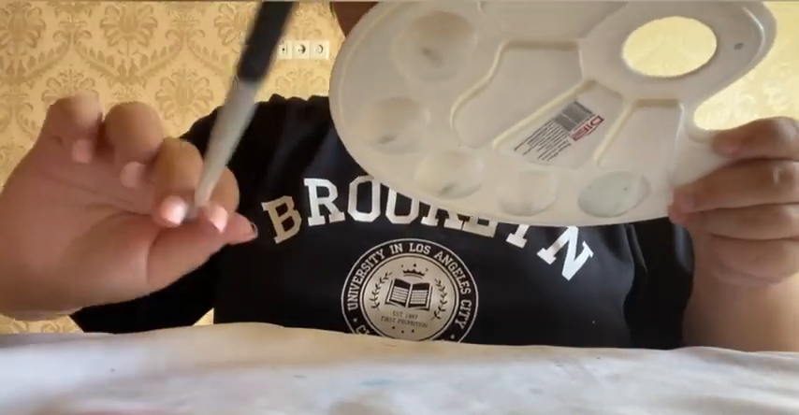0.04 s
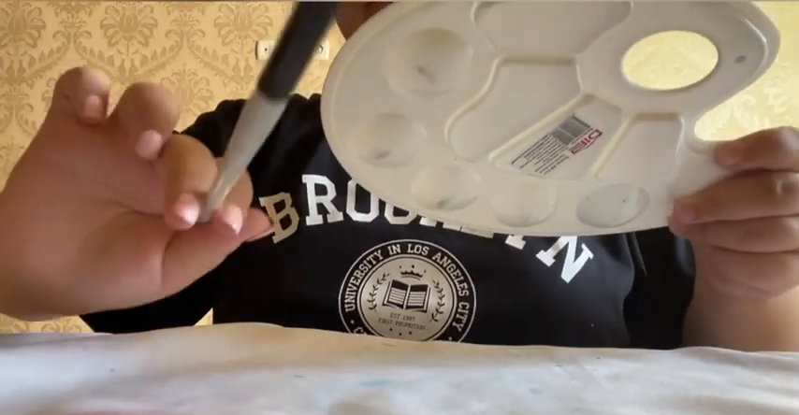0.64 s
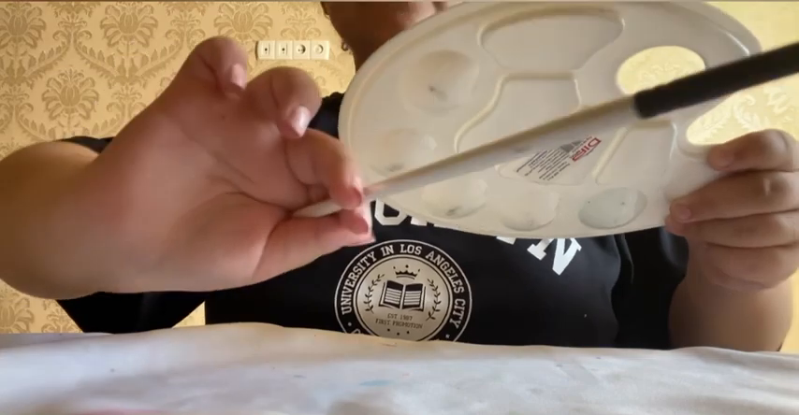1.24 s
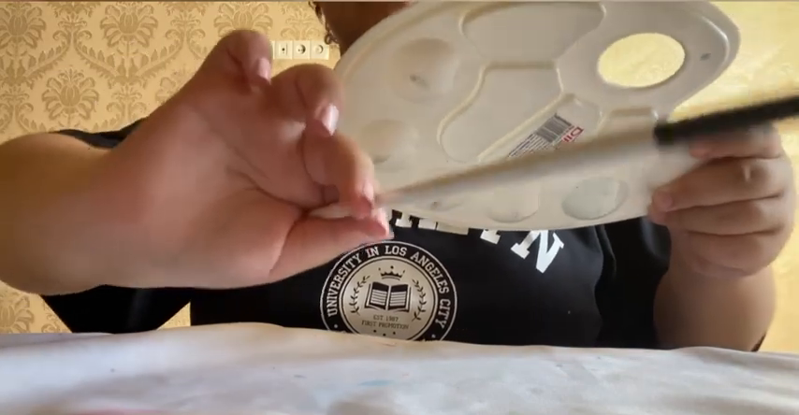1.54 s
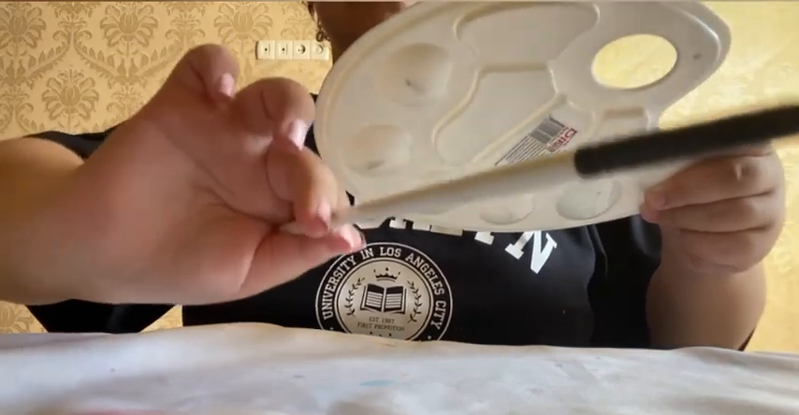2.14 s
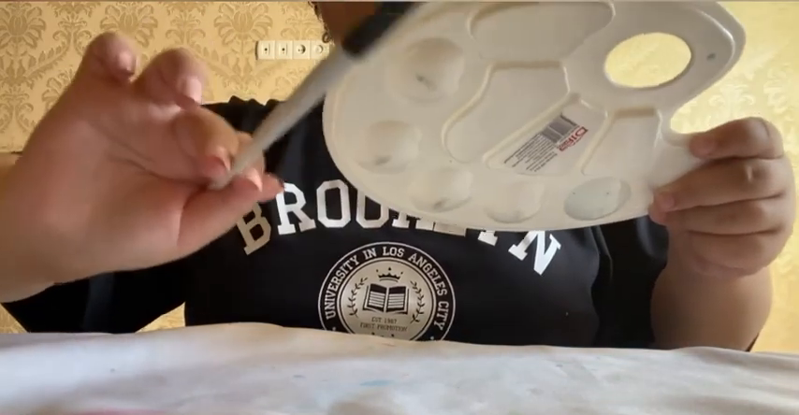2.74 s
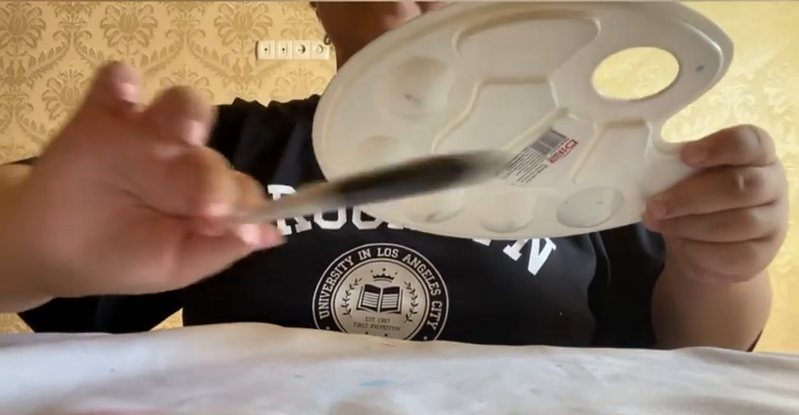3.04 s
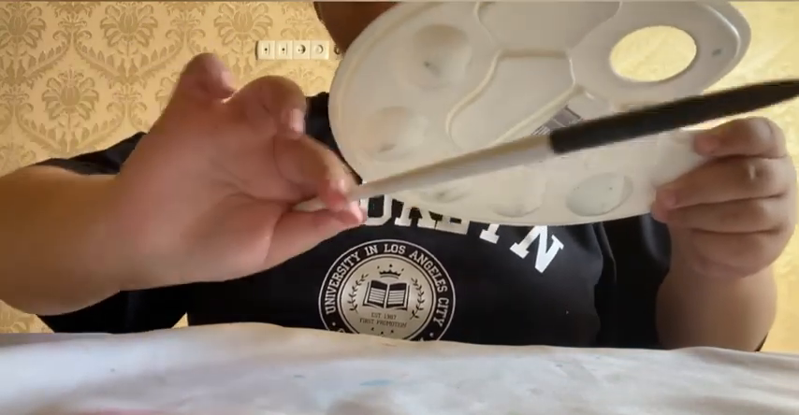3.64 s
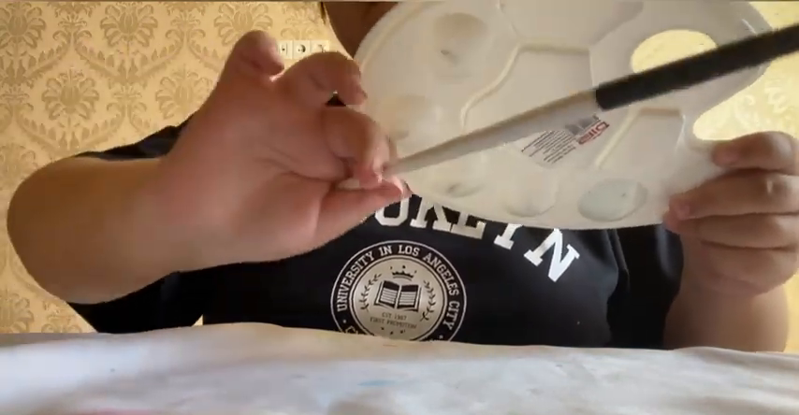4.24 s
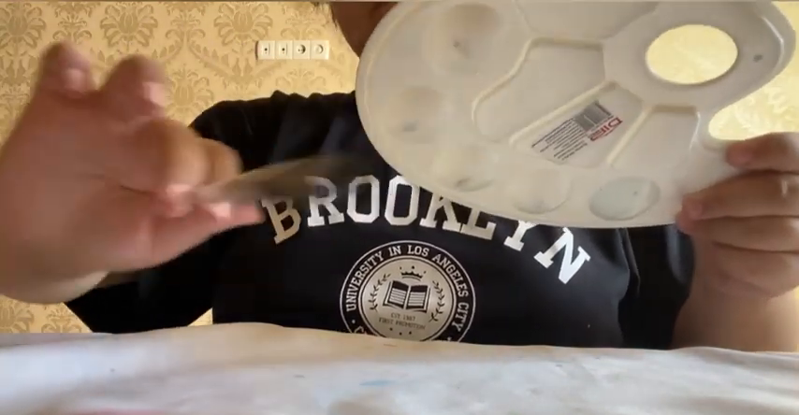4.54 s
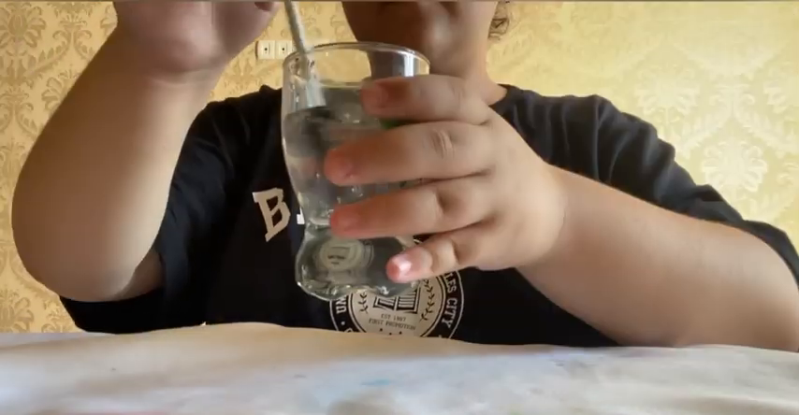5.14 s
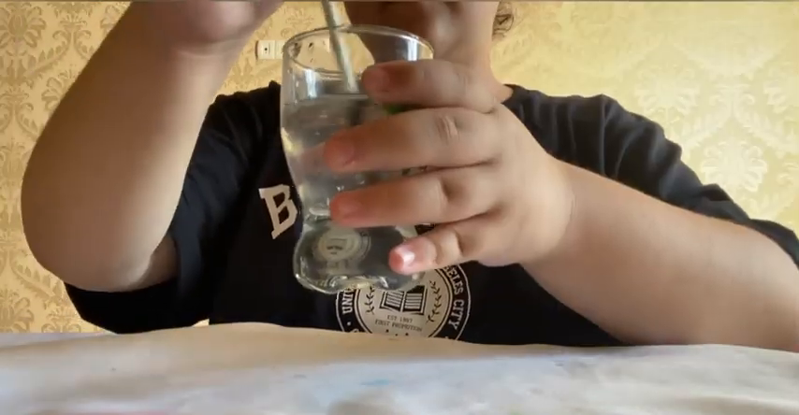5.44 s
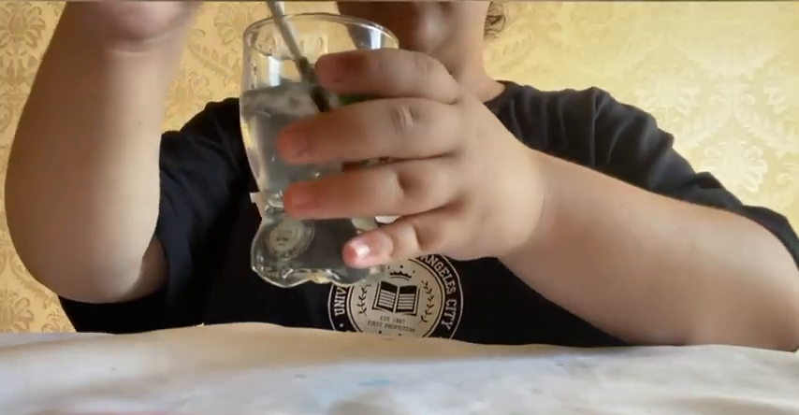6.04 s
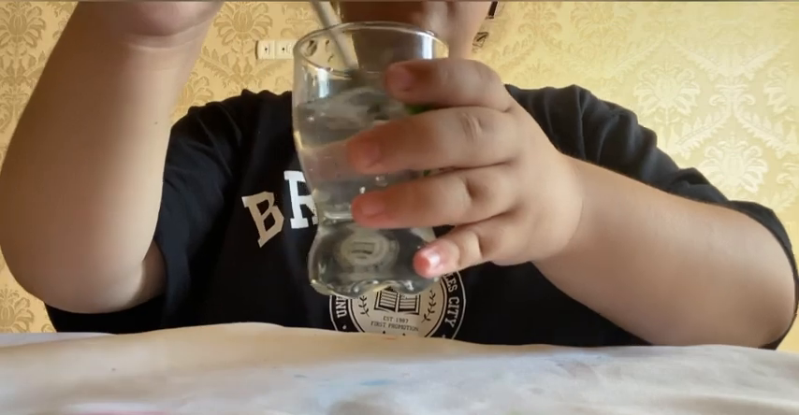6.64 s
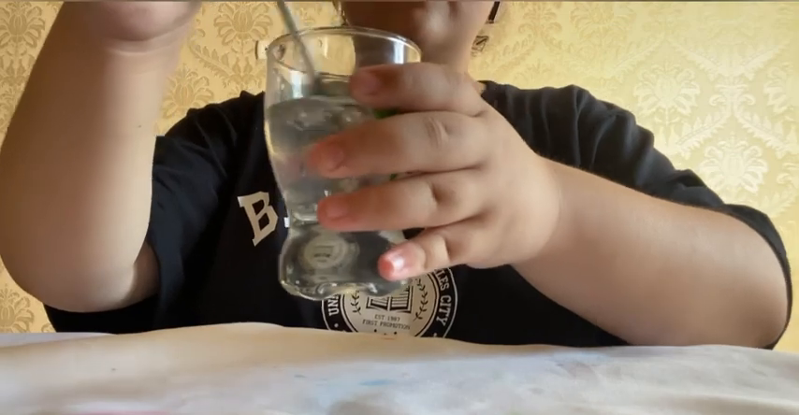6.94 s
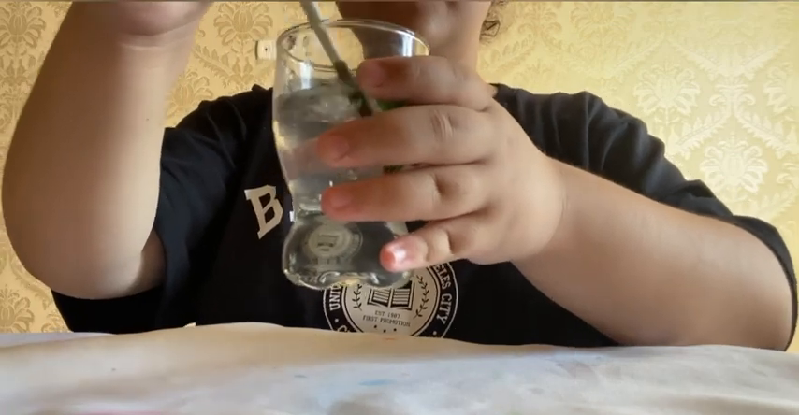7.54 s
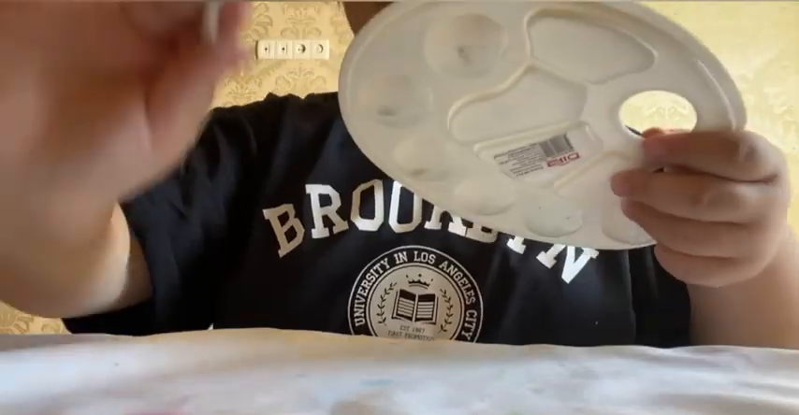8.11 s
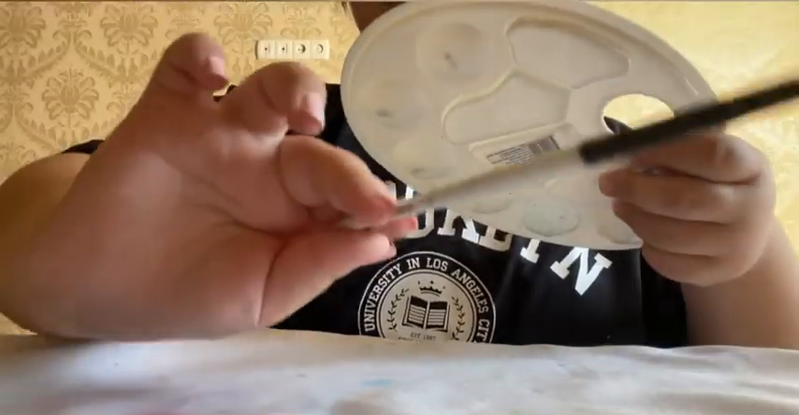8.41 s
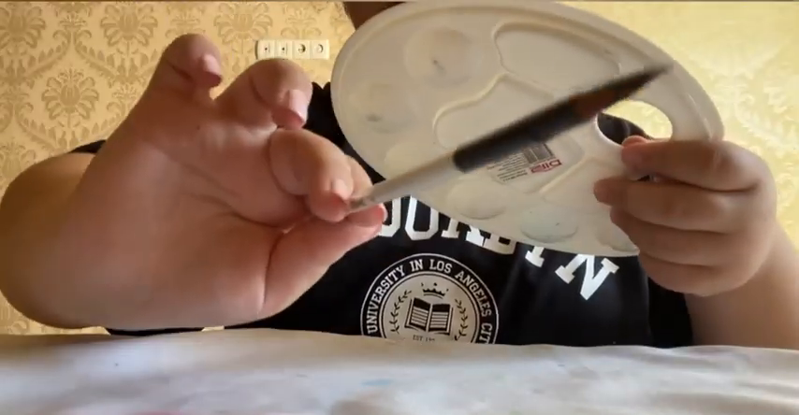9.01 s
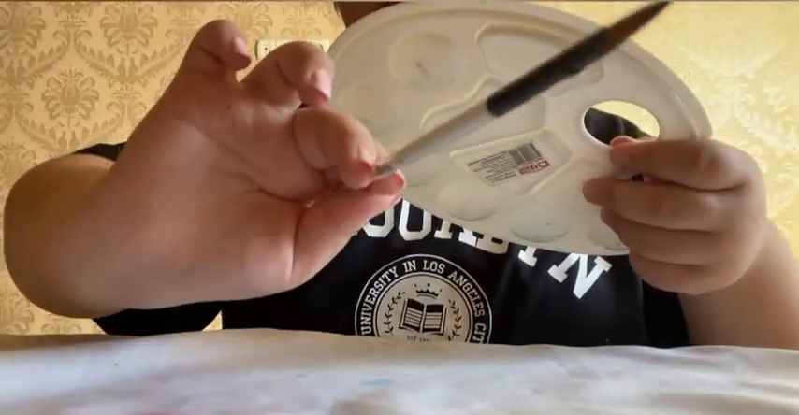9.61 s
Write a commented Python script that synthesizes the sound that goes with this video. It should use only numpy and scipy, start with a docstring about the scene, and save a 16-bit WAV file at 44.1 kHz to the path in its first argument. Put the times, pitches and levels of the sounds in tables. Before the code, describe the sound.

A paintbrush dabs and scratches on a plastic palette, swishes and clinks in a glass of water, then returns to lighter dabbing.

```python
"""Scrubbing and rinsing a paintbrush

A brush dabs and scrubs on a plastic surface right at the microphone: bristles rasp and snap,
and each dab sends a falling thump through the plastic. The scene cuts to a glass of water a
little further off: water swishes and plops, the handle ticks and clinks on the glass, and a
small room answers. Then it cuts back to lighter brushing."""
import sys
import numpy as np
from scipy import signal
from scipy.fft import rfft, irfft, next_fast_len
from scipy.io import wavfile
from scipy.ndimage import map_coordinates

SR = 44100
rng = np.random.default_rng(int(sys.argv[2]) if len(sys.argv) > 2 else 0)


def materialize(psi):
    """Save the field psi as 16-bit PCM at rate SR to the path in sys.argv[1].

    A 1-D psi becomes a single channel; in a 2-D psi each row is a channel.
    """
    bounded = np.clip(np.atleast_2d(psi).T, -1, 1)
    quanta = np.round(bounded * 32767).astype(np.int16)
    wavfile.write(sys.argv[1], SR, quanta)


N = 430857
RINSE_START_S, RINSE_END_S = 5.157, 8.301
LIGHTER_RASP_DB = -4  # the bristles are quieter after the rinse

# Levels in the tables are relative. Likeness is 1 when left and right move together.
# Tone of the microphone hiss: pitch_hz, level_db
HISS_TONE = [(290, -14.5), (500, 2.5), (688, -1), (1080, -2.5), (1870, -10.5), (2070, -9.5), (4530, -20.5),
             (7640, -27), (9770, -32.5), (11800, -29), (14000, -18.5), (16000, -25)]
# Stereo width of the hiss: pitch_hz, likeness
HISS_LIKENESS = [(600, 0.36), (1300, 1), (2500, 1)]
# Tone of the quiet room: pitch_hz, level_db
AIR_TONE = [(20, -27), (45, 0.5), (75, -11.5), (160, -7.5), (260, -15.5), (450, -22), (900, -24),
            (1400, -37.5), (2500, -47.5), (7500, -53), (9500, -62), (12500, -52), (14500, -73)]
# Stereo width of the quiet room: pitch_hz, likeness
AIR_LIKENESS = [(60, 0.6), (150, 0.6), (300, 0.1), (700, -0.53), (3000, -0.3)]
# Time the room's echo takes to fade by 60 dB: pitch_hz, fade_s
ROOM_FADE = [(300, 0.44), (1500, 0.32), (4500, 0.24), (8000, 0.25), (14000, 0.18)]
# How much louder the glass is on the left: pitch_hz, difference_db
LEFT_LOUDER = [(1150, -2.5), (1450, 2), (1820, 5.5), (2300, 3), (2850, 2), (4600, 0.5), (6300, -3.5),
               (8000, 1), (12500, 0)]
# How far its sound is ahead on the right: pitch_hz, phase_radians
RIGHT_AHEAD = [(1050, 0), (1450, 0.4), (1820, 1.65), (2300, 2), (2850, 1.83), (4600, 1.5), (6300, 0.5),
               (8000, -1.7), (12500, -1.5)]
# Tone of stirred water: pitch_hz, level_db
SWISH_TONE = [(550, -22), (850, -6.5), (1130, 3.5), (1500, 5), (1850, -0.5), (2050, -8.5), (2300, 4),
              (2600, -12.5), (2850, 3), (3150, -11), (4600, -16), (7000, -25.5), (12000, -34)]
# Air pockets closing in the water: start_s, level_db, pitch_hz, splash_db
PLOP_EVENTS = [(6.112, -50.5, 1200, -5), (6.244, -45, 1285, -5), (6.251, -43.5, 1830, -7),
               (6.2618, -44.5, 1820, -15), (6.314, -47, 1197, -15), (6.3307, -47.5, 1160, -16),
               (6.4284, -47.5, 1790, -12), (6.4586, -49.5, 1330, -11), (6.4711, -44.5, 1310, -3),
               (6.507, -49, 2320, -25), (6.6286, -36, 1110, -32), (6.6735, -49.5, 1087, -16),
               (6.7086, -46, 1180, -24), (6.7943, -34.5, 1410, -13.5), (6.8165, -45, 1105, -12.5),
               (6.8535, -34.5, 2710, -20), (6.8644, -42.5, 1310, -11), (6.8795, -45.5, 1150, -13.5),
               (6.882, -49.5, 3770, -18.5), (6.977, -50.5, 1450, -17.5), (7.031, -43.5, 1150, -6),
               (7.0446, -39, 1900, -9.5), (7.0552, -38.5, 1184, -13.5), (7.1504, -43, 1346, -4),
               (7.1679, -41, 1340, -5), (7.3418, -39.5, 1477, -11), (7.5258, -33.5, 1413, -10.5),
               (7.562, -51, 1260, -6), (7.7134, -40.5, 1470, -31)]
# Strength of the smaller bubbles: pitch_hz, level_db
SPLASH_TONE = [(1500, 3.5), (2300, -0.5), (3200, -7.5), (4500, -21.5), (6500, -23.5)]
# Notes of the glass, damped by the hand: pitch_hz, level_db, fade_s
GLASS_NOTES = [(1116, -13, 0.08), (1767, -19, 0.06), (2834, -1.5, 0.058), (3290, -16.5, 0.022),
               (3850, -15.5, 0.041), (4530, -5.5, 0.026), (4585, 1.5, 0.035), (4530, -5.5, 0.02),
               (5210, -14, 0.026), (6340, -18, 0.03), (7980, -6.5, 0.031), (8064, -5.5, .035),
               (9970, -17.5, 0.014), (12820, -18, 0.04)]
# Droplets and light touches of the brush's metal collar: start_s, level_db
TICK_EVENTS = [(5.652, -66), (5.796, -49), (5.8745, -59.5), (6.0573, -54.5), (6.0771, -60), (6.473, -51),
               (6.6318, -47), (6.65, -49.5), (6.6924, -53), (6.8077, -58), (6.9647, -61.5), (7.3696, -68),
               (7.5438, -60), (7.713, -64)]
# Tone of a tick: pitch_hz, level_db
TICK_TONE = [(300, -47), (900, -30), (2800, -4), (5500, -14), (7300, 6), (9300, -16.5), (12500, 0.5),
             (14000, -5), (16000, -19)]
# The handle hitting the glass: start_s, level_db, treble_db, crack_db
CLINK_EVENTS = [(5.7964, -47.5, -6, 20), (6.1468, -22.5, -1, 6), (7.0756, -18.5, -7, 2)]
# Tone of the crack that starts a clink: pitch_hz, level_db
CRACK_TONE = [(150, -37), (500, -14), (800, 6), (2500, 4), (3500, 2), (5500, 1.5), (8200, -5.5),
              (9300, -17.5), (11000, -4), (12600, 0), (14000, -16), (16000, -22)]
# Tone of the shaking plastic: pitch_hz, level_db
PLASTIC_TONE = [(18, -43), (32, -12), (50, 2.5), (90, -1), (150, -1.5), (230, -8.5), (330, -14), (560, -22),
                (1200, -29), (1600, -46), (2600, -100)]
# Stereo width of its rumble: pitch_hz, likeness
PLASTIC_LIKENESS = [(60, 0.97), (200, 0.95), (400, 0.88), (700, 0.44), (1400, 0.82)]
# Tone of slipping bristles: pitch_hz, level_db
BRISTLE_TONE = [(150, -31), (500, -2.5), (1100, -3.5), (1700, 1), (2150, -7.5), (2700, -5.5), (4500, -9),
                (7200, -12.5), (9500, -19.5), (12000, -22.5), (14500, -15), (16000, -17.5)]
# Scrubbing strokes: start_s, end_s, level_db, treble_db
STROKE_EVENTS = [(0, 0.044, -58, 3), (0.066, 0.211, -64.5, 0.5), (0.247, 0.315, -57.5, -4.5),
                 (0.415, 0.462, -61.5, 1.5), (0.592, 0.646, -55, -14), (1.055, 1.153, -62, 0.5),
                 (1.352, 1.378, -58, 2.5), (1.691, 1.787, -62, -4), (1.814, 1.917, -63, -6),
                 (1.992, 2.1, -59, -8), (2.178, 2.283, -62, -3.5), (2.291, 2.323, -53.5, -6),
                 (2.45, 2.527, -58, -13), (2.573, 2.599, -61.5, 0.5), (2.772, 2.86, -66.5, -10),
                 (2.892, 2.97, -59, -6.5), (3.02, 3.083, -73, 4.5), (3.46, 3.508, -63, -23),
                 (3.564, 3.616, -66.5, -1), (3.733, 3.77, -60, -12), (4.014, 4.058, -59, -3.5),
                 (4.265, 4.312, -65, 0), (4.46, 4.57, -67.5, -5.5), (4.766, 4.799, -59.5, -7.5),
                 (4.975, 5.038, -68, -7), (8.391, 8.408, -75, 0), (8.916, 8.926, -59.5, -6),
                 (9.594, 9.73, -73.5, -7)]
# Tufts snapping free: start_s, level_db, treble_db, ring_db
SNAP_EVENTS = [(0.43, -42.5, -22, -11), (0.789, -43.5, -16, -9), (0.8515, -46.5, -7, -20),
               (1.002, -42.5, -13, -22), (1.074, -42.5, -19, -17), (1.2999, -41.5, -10, -25),
               (1.3747, -44, -24, 0), (1.4499, -39.5, -11.5, -12), (1.5398, -38.5, -12, -24),
               (1.5455, -38, -8, -14), (1.901, -42, -14, -10), (2.007, -44, -10.5, -7),
               (2.461, -47, -18, -16), (2.4758, -41, -10, -17), (2.5433, -37.5, -15.5, -21),
               (2.5987, -42.5, -5, -18), (2.9235, -42, -15, -14), (3, -46, -17.5, -11),
               (3.0612, -38.5, -11, -2.5), (3.0786, -38, -14, -15), (3.239, -40.5, -8, -23),
               (3.247, -34.5, -10.5, -3.5), (3.3387, -51, -11, -17), (3.5638, -45.5, -12, -15),
               (3.7656, -50, -28, 2), (3.8993, -45, -9, -27), (4.1093, -43.5, -11.5, -4),
               (4.115, -44, -17, -12), (4.3055, -44, -15, -2), (4.366, -40, -11, -1),
               (4.37, -43.5, -12, -7), (4.5259, -42, -8, -15), (4.582, -50, -23, -8),
               (4.609, -46, -12, -10), (4.7665, -45, -8.5, -10), (4.8419, -41, -10, -13),
               (5.052, -45, -3.5, 2.5), (8.3015, -45.5, -13.5, -24), (8.617, -49.5, -30, -4),
               (8.8258, -44.5, -13, -21), (8.917, -47, 7, -18), (9.047, -51.5, -37, 5.5)]
# Dabs on the plastic: start_s, knock_db, bass_db
DAB_EVENTS = [(0.24, -57, -48), (0.366, -47.5, -51), (0.491, -45.5, -48), (0.635, -45.5, -46.5),
              (0.741, -41.5, -42.5), (0.858, -52, -40), (0.97, -42.5, -36.5), (1.103, -60, -45),
              (1.225, -43.5, -40), (1.297, -49, -42), (1.39, -51, -38), (1.505, -42, -39),
              (1.628, -50, -43), (1.735, -49, -47), (2.311, -41.5, -45), (2.522, -42, -45),
              (2.543, -39.5, -40), (2.749, -41, -41), (2.899, -45.5, -48), (3.107, -41, -44.5),
              (3.176, -38, -43), (3.22, -39, -51), (3.368, -46.5, -51), (3.39, -38.5, -55),
              (3.432, -38, -43), (3.576, -45.5, -44), (3.688, -45.5, -46.5), (3.815, -61, -42),
              (3.956, -40.5, -37.5), (4.023, -38.5, -58), (4.238, -40, -41.5), (4.303, -44, -50),
              (4.424, -54, -37.5), (4.527, -39.5, -48), (4.652, -49, -43), (4.794, -39.5, -43.5),
              (4.978, -49, -42.5), (5.055, -42, -38.5), (8.3017, -41.5, -45.5), (8.617, -51, -51),
              (8.874, -41, -39.5), (9.048, -48, -55), (9.087, -41, -47), (9.18, -52, -54),
              (9.32, -49.5, -49), (9.619, -52, -50)]


def amp(db):
    """Turn decibels into a gain."""
    return 10 ** (np.asarray(db) / 20)


def fade(t, fade_s):
    """A gain that drops 60 dB every fade_s seconds."""
    return amp(-60 * t / fade_s)


def unit_rms(x):
    """Scale to an average (rms) level of 1."""
    return x / np.sqrt(np.mean(x ** 2) + 1e-20)


def unit_peak(x):
    """Scale to a peak of 1."""
    return x / np.abs(x).max()


def look_up(table, hz):
    """Read between a table's rows on a log pitch scale."""
    pitches, values = np.transpose(table)
    return np.interp(np.log(hz + 1), np.log(pitches + 1), values)


def wobble(per_s):
    """A smooth curve through per_s random points a second."""
    points = rng.standard_normal(int(N * per_s / SR) + 4)
    return map_coordinates(points, [np.arange(N) * per_s / SR])


def filtered(x, gain_at):
    """Multiply each frequency in x by gain_at(hz)."""
    n = x.shape[-1]
    padded = next_fast_len(n + 8192)
    return irfft(rfft(x, padded) * gain_at(np.fft.rfftfreq(padded, 1 / SR)), padded)[..., :n]


def coloured(x, tone):
    """Give x a tone, with a filter that never rings ahead of the sound."""
    cepstrum = irfft(np.log(amp(look_up(tone, np.fft.rfftfreq(2048, 1 / SR)))))
    half = len(cepstrum) // 2
    folded = np.r_[cepstrum[0], 2 * cepstrum[1:half], np.zeros(half)]
    return signal.oaconvolve(x, irfft(np.exp(rfft(folded))))[:len(x)]


def stereo_noise(tone, likeness):
    """Noise with the given tone and left-right likeness."""
    def gains(hz):
        angle = np.arccos(np.clip(look_up(likeness, hz), -1, 1)) / 2
        return amp(look_up(tone, hz)) * [np.cos(angle), np.sin(angle)]
    mid, side = filtered(rng.standard_normal((2, N)), gains)
    return unit_rms(np.array([mid + side, mid - side]))


def crackle(per_s, spread_db):
    """Tiny clicks of random time, sign and size."""
    clicks = (rng.random(N) < per_s / SR) * rng.choice([-1, 1], N)
    return clicks * amp(spread_db * rng.standard_normal(N))


def add(track, start_s, sound):
    """Mix a sound into the track."""
    part = track[..., round(start_s * SR):][..., :sound.shape[-1]]
    part += sound[..., :part.shape[-1]]


def after_rinse(db):
    """A gain that steps by db for the brushing after the rinse."""
    return amp(db * (np.arange(N) / SR > RINSE_START_S))


def microphone_hiss():
    """A faint, steady hiss behind the brushing."""
    return amp(-66.5) * stereo_noise(HISS_TONE, HISS_LIKENESS)


def room_tone():
    """The room's low, gently wavering noise."""
    return amp(-58.5 + wobble(8.7)) * stereo_noise(AIR_TONE, AIR_LIKENESS)


def room_echo(x, echo_db, gap_s=0.00061):
    """Add the room's soft echo, whose treble dies first."""
    hz, t, spectrum = signal.stft(rng.standard_normal((2, SR // 3)), SR, nperseg=256)
    tail = signal.istft(spectrum * fade(t, look_up(ROOM_FADE, hz)[:, None]), SR, nperseg=256)[1]
    tail *= np.clip(np.arange(tail.shape[1]) / SR / gap_s - 1, 0, 1)
    tail /= np.linalg.norm(tail[0])
    return x + amp(echo_db) * signal.oaconvolve(x, tail, axes=1)[:, :N]


def at_glass(x):
    """The glass stands off centre, so left and right differ in level and phase."""
    sides = np.array([[0.5], [-0.5]])
    def gains(hz):
        return amp(sides * look_up(LEFT_LOUDER, hz)) * np.exp(-1j * sides * look_up(RIGHT_AHEAD, hz))
    return filtered(np.array([x, x]), gains)


def water_swish(width_s=0.011, lag_s=0.01):
    """The brush stirs up a fizz of tiny bubbles around every plop and clink."""
    t, power = np.arange(N) / SR, np.zeros(N)
    stirs = [(start_s + lag_s, db - 23) for start_s, db, *_ in PLOP_EVENTS]
    stirs += [(start_s, db - 38) for start_s, db, *_ in CLINK_EVENTS]
    for centre_s, db in stirs:
        power += amp(db) ** 2 * np.exp(-2 * np.abs(t - centre_s) / width_s)
    fizz = unit_rms(coloured(crackle(per_s=900, spread_db=4), SWISH_TONE))
    return room_echo(at_glass(np.sqrt(power) * fizz), echo_db=-7.5)


def bubble(t, hz, fade_s, sag, settle_s=0.0049):
    """A short plop that fades in softly and rings briefly as its pitch sags."""
    t = np.maximum(t, 0)
    phase = 2 * np.pi * hz * (t * (1 - sag / 2) + sag * settle_s * (1 - np.exp(-t / settle_s)))
    fade_in = 1 - np.exp(-(t * hz / 1.6) ** 2)
    return np.sin(phase) * fade(t, fade_s) * fade_in


def water_plops(ring_cycles=42, tiny_count=7, trail_s=0.015, trail_octaves=1.4):
    """One main air pocket rings, with a splash: a smaller pocket and a trail of tiny bubbles."""
    out, t = np.zeros((2, N)), np.arange(SR // 12) / SR
    for start_s, db, hz, splash_db in PLOP_EVENTS:
        fade_s = ring_cycles / hz  # higher plops die sooner
        small_hz = hz * 1.6 * amp(rng.normal(0, 0.4))
        splash = amp(2 + look_up(SPLASH_TONE, small_hz)) * bubble(t, small_hz, fade_s, sag=0.06)
        for earliness, smallness in rng.random((tiny_count, 2)):
            tiny_hz = hz * 2 ** (trail_octaves * smallness)
            delay_s = -trail_s * np.log(earliness)
            tiny = bubble(t - delay_s, tiny_hz, fade_s=0.012, sag=0.1)
            splash += amp(look_up(SPLASH_TONE, tiny_hz)) * tiny
        plop = bubble(t, hz, fade_s, sag=0.2) + amp(splash_db) * splash
        add(out, start_s, at_glass(amp(db) * unit_peak(plop)))
    return room_echo(out, echo_db=-10)


def glass_ticks(click_s=0.0068, ring_db=-24):
    """Light touches and droplets click and barely ring the glass."""
    out, t = np.zeros((2, N)), np.arange(SR // 25) / SR
    notes = [amp(db) * fade(t, fade_s) * np.sin(2 * np.pi * hz * t) for hz, db, fade_s in GLASS_NOTES]
    ring = amp(ring_db) * unit_peak(sum(notes))
    for start_s, db in TICK_EVENTS:
        click = unit_peak(coloured(rng.standard_normal(len(t)) * fade(t, click_s), TICK_TONE))
        add(out, start_s, at_glass(amp(db + 1) * (click + ring)))
    return room_echo(out, echo_db=-11)


def glass_clinks(crack_s=0.013, attack_s=0.001, roughness_hz=4):
    """The handle hits the hand-damped glass. Each clink has its own loudness, brightness and crack."""
    out, t = np.zeros((2, N)), np.arange(SR // 8) / SR
    for start_s, db, treble_db, crack_db in CLINK_EVENTS:
        ring = np.zeros(len(t))
        for hz, note_db, fade_s in GLASS_NOTES:
            level = amp(note_db + rng.normal(0, 1)) * fade(t, fade_s)
            drift = np.cumsum(rng.standard_normal(len(t))) * np.sqrt(2 * np.pi * roughness_hz / SR)
            ring += level * np.sin(2 * np.pi * hz * t + drift)
        crack = coloured(amp(crack_db) * fade(t, crack_s) * rng.standard_normal(len(t)), CRACK_TONE)
        tilt = [(200, -19), (800, -8 - treble_db), (3000, 5), (4500, treble_db + 6.5)]
        hit = coloured((ring + crack) * (1 - np.exp(-t / attack_s)), tilt)
        add(out, start_s, at_glass(amp(db + 2.5) * unit_peak(hit)))
    return room_echo(out, echo_db=-14.5, gap_s=0.0079)


def plastic_rumble(drag_db=-51, lumps_db=2, press_s=0.017):
    """The dragging brush shakes the plastic, harder while each dab presses down."""
    pressure = amp(drag_db) * after_rinse(-4.5)
    progress = np.arange(SR // 4) / SR / press_s
    press = progress * np.exp(1 - progress)
    for start_s, _, bass_db in DAB_EVENTS:
        add(pressure, start_s, amp(bass_db - 14) * press)
    lumps = amp(lumps_db * wobble(45))
    return pressure * unit_rms(lumps * stereo_noise(PLASTIC_TONE, PLASTIC_LIKENESS))


def bristle_rasp(drag_db=-69, clump_db=2.5, edge_s=0.0025, split_hz=3000):
    """Bristles stick and slip in clumps of clicks. Each stroke has its own loudness and brightness."""
    slips = crackle(per_s=4500, spread_db=3) * amp(clump_db * wobble(150))
    grains = unit_rms(coloured(slips, BRISTLE_TONE))
    dull = filtered(grains, lambda hz: 1 / (1 + (hz / split_hz) ** 4))
    dull_gain = amp(drag_db + wobble(9.8)) * after_rinse(LIGHTER_RASP_DB)  # drag between strokes
    treble_gain = dull_gain.copy()
    for start_s, end_s, db, treble_db in STROKE_EVENTS:
        t = np.arange(int((end_s - start_s + 2 * edge_s) * SR)) / SR
        swell = np.clip(np.minimum(t, t[-1] - t) / edge_s / 2, 0, 1) * amp(db - 4)
        rise_s = max(start_s - edge_s, 0)
        add(dull_gain, rise_s, swell)
        add(treble_gain, rise_s, swell * amp(treble_db + 5))
    return dull_gain * dull + treble_gain * (grains - dull)


def bristle_snaps(burst_s=0.022, hollow_hz=1680, hollow_s=0.017, usual_ring_db=-13.5, strays_per_s=3):
    """A bent tuft lets go in a short burst and rings the hollow plastic."""
    out, t = np.zeros(N), np.arange(SR // 25) / SR
    snaps = list(SNAP_EVENTS)
    for start_s, knock_db, _ in DAB_EVENTS:  # every dab snaps a few bristles too
        treble_db = -29 if start_s > RINSE_START_S else -14
        snaps.append((start_s, knock_db - 5.5, treble_db, usual_ring_db))
    tries = N // 2048
    for when, size, luck in rng.random((tries, 3)):  # faint stray bristles
        if luck < strays_per_s * N / SR / tries:
            start_s = when * N / SR
            db = -52 + 6.5 * (2 * size - 1) + LIGHTER_RASP_DB * (start_s > RINSE_START_S)
            snaps.append((start_s, db, -13.5, usual_ring_db))
    for start_s, db, treble_db, ring_db in snaps:
        burst = coloured(rng.standard_normal(len(t)) * fade(t, burst_s), BRISTLE_TONE)
        burst = coloured(burst, [(500, -11), (1400, -6), (3000, -9), (8000, treble_db + 5)])
        ring_hz = hollow_hz * amp(rng.normal(0, 0.22))
        ring = amp(ring_db) * fade(t, hollow_s) * np.sin(2 * np.pi * ring_hz * t)
        add(out, start_s, amp(db - 2) * (unit_peak(burst) + ring))
    return out


def brush_dabs(length_s=0.059, attack_s=0.0011, split_hz=220, echo_db=-11):
    """High notes cross the plastic faster, so a dab arrives as a falling thump, then again off an edge."""
    out, t = np.zeros(N), np.arange(SR // 8) / SR
    envelope = (1 - np.exp(-t / attack_s)) * amp(-60 * (t / length_s) ** 2)
    for start_s, knock_db, bass_db in DAB_EVENTS:
        direct_sweep = 1.55 * amp(rng.normal(0, 0.73))
        travel_s = 0.0006785 * amp(rng.normal(0, 1.69))
        detour = 2.3 * amp(rng.normal(0, 1.47))  # the path by the edge is this many times longer
        for sweep, path_db in ((direct_sweep, 0), (direct_sweep * detour, echo_db)):
            pitch_hz = sweep / (t + travel_s)
            bass_share = 1 / (1 + (pitch_hz / split_hz) ** 2)  # 0 in the knock, 1 in the tail
            db = path_db + (1 - bass_share) * (knock_db - 2) + bass_share * (bass_db + 4)
            chirp = np.sin(2 * np.pi * sweep * np.log(1 + t / travel_s))
            add(out, start_s, amp(db) * envelope * chirp)
    return out


def scene():
    """Brushing, a sudden cut to the rinse, and a sudden cut back."""
    t = np.arange(N) / SR
    hiss, air = microphone_hiss(), room_tone()
    rinse = air + glass_clinks() + water_plops() + glass_ticks() + water_swish()
    brushing = hiss + bristle_rasp() + plastic_rumble() + brush_dabs() + bristle_snaps()
    return np.where((t > RINSE_START_S) & (t < RINSE_END_S), rinse, brushing)


def record(dry):
    """Remove the very highest treble."""
    return filtered(dry, lambda hz: hz < 15850)


dry = scene()
out = record(dry)
materialize(out)
```